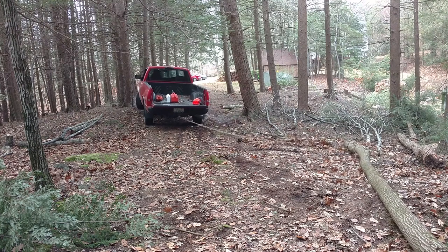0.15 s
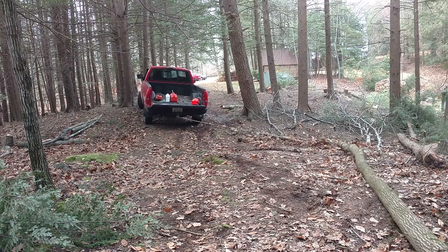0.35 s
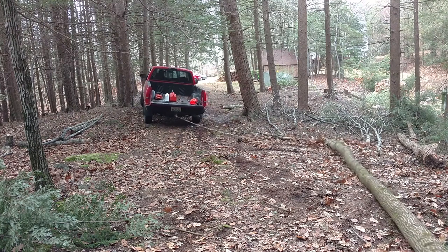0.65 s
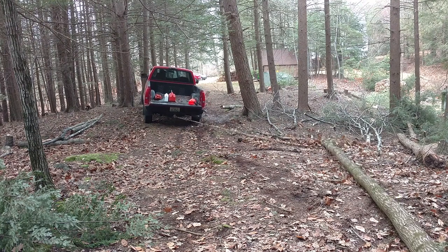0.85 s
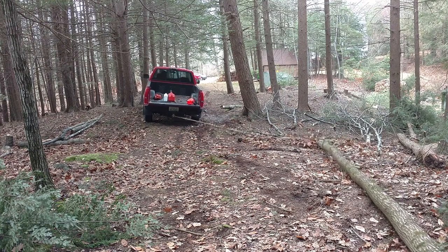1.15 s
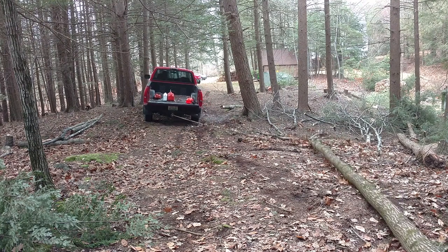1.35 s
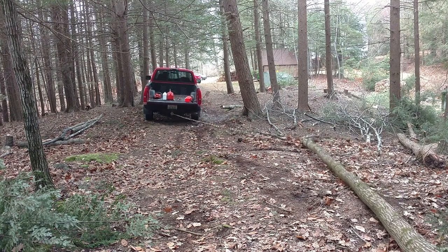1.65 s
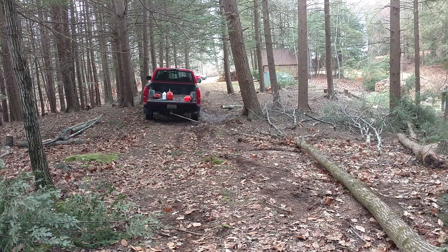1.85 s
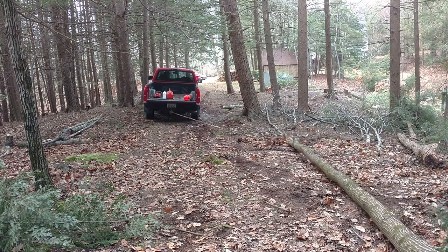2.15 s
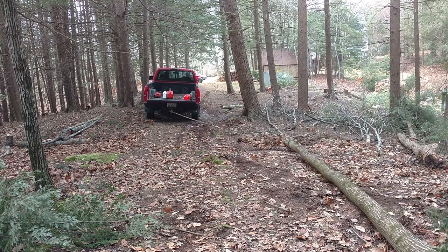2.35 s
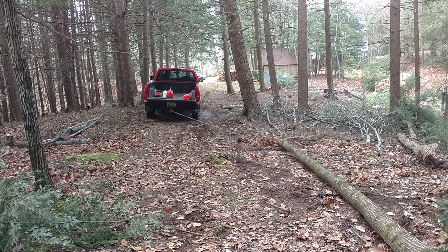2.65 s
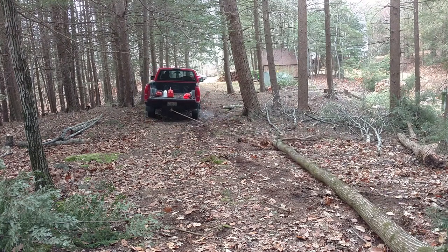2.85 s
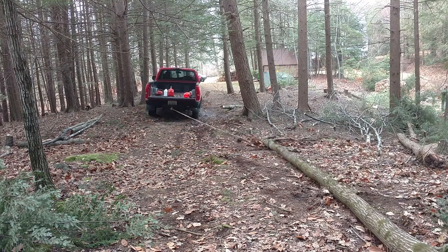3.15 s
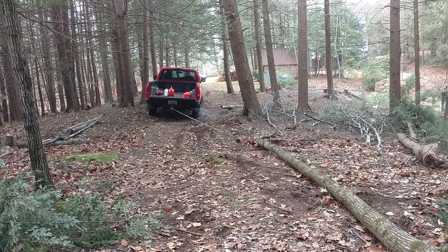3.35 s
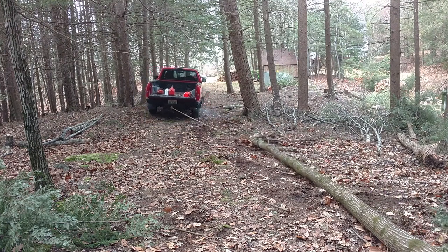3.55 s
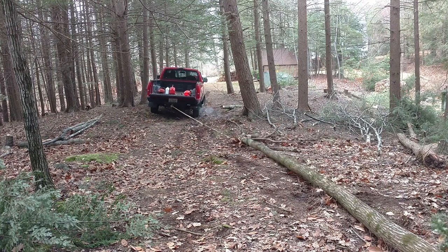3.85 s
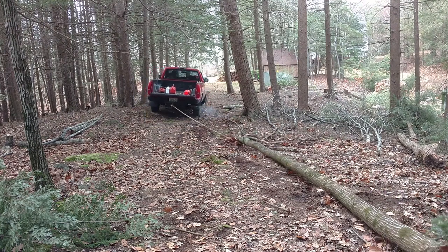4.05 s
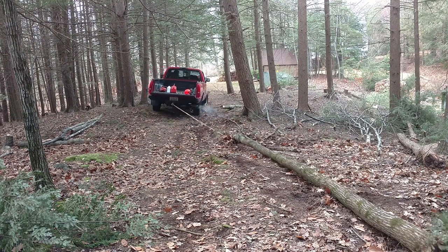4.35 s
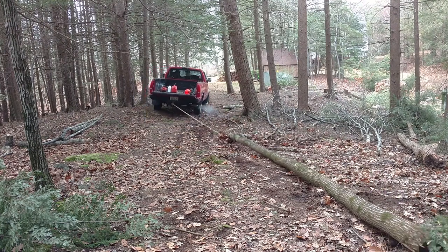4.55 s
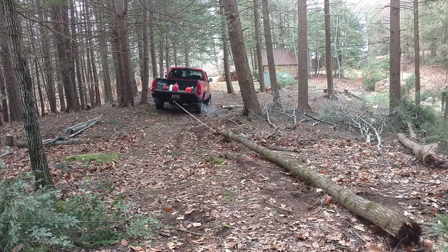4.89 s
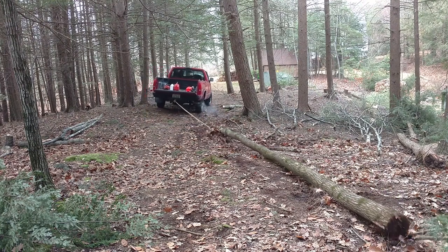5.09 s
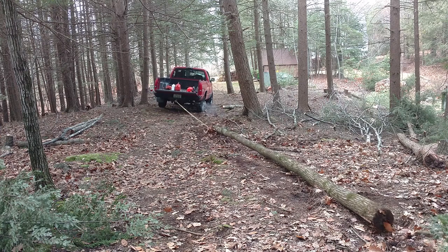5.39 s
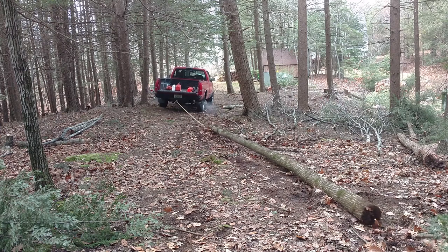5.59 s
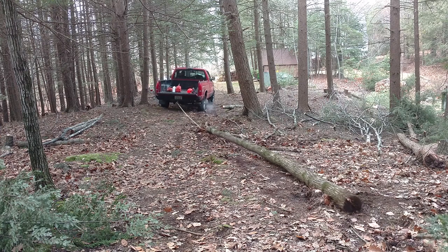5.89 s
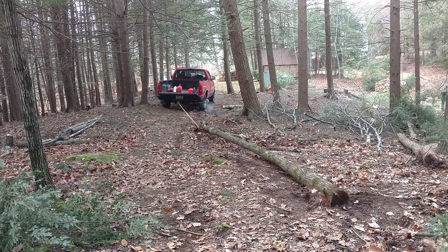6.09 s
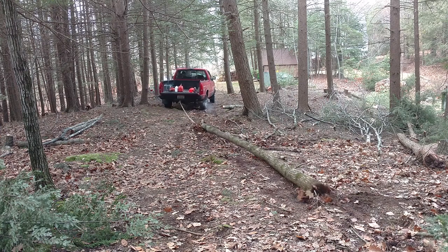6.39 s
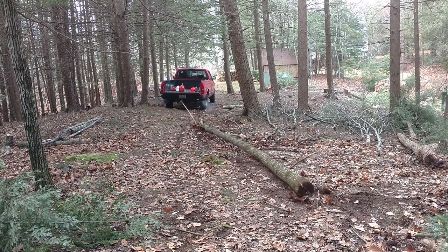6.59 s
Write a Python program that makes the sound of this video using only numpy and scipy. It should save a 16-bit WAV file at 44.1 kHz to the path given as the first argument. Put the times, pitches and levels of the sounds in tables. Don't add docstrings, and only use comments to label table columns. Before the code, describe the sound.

In a wood, a pickup's uneven low engine throbs in the distance while a log nearby drags over dry leaves. Crisp rustling and dull bark scraping run throughout, with twig cracks, a soft thud on a root and a very loud snap early on. The engine then revs in surges and the leaf crush thins. A small wide stereo microphone briefly ducks after loud cracks.

```python
import sys
import numpy as np
from scipy import signal
from scipy.fft import rfft, irfft, next_fast_len
from scipy.io import wavfile
from scipy.ndimage import uniform_filter1d

SR = 44100
rng = np.random.default_rng(int(sys.argv[2]) if len(sys.argv) > 2 else 0)


def ratio(d):
    e = np.asarray(d, float) / 20
    return 10 ** e


def dump_mix(stems):
    frames = np.atleast_2d(stems).T
    limited = np.clip(frames, -1, 1)
    pcm = np.round(limited * 32767).astype(np.int16)
    wavfile.write(sys.argv[1], SR, pcm)


N = 296793


def evened(x):
    return x / np.sqrt(np.mean(x ** 2) + 1e-20)


def columns(table, t):
    s, *rest = np.transpose(table)
    return [np.interp(t, s, c) for c in rest]


def read(points, hz):
    f, value = np.transpose(points)
    return np.interp(np.log(hz + 1), np.log(f + 1), value)


def add(mix, s, sound):
    part = mix[:, round(s * SR):][:, :sound.shape[-1]]
    part += sound[..., :part.shape[1]]


def delayed(hz, lag_samples):
    return np.exp(-2j * np.pi * hz * lag_samples / SR)


def resonate(x, hz, width_hz):
    r = np.exp(-np.pi * width_hz / SR)
    return 2 * signal.lfilter([1 - r], [1, -r * np.exp(2j * np.pi * hz / SR)], x).real


def wander(hz, count):
    step = 64
    lowpass = signal.butter(1, 2 * hz * step / SR)
    coarse = signal.lfilter(*lowpass, rng.standard_normal((count, N // step + 2)))
    curves = np.repeat(evened(coarse), step, axis=1)[:, :N]
    return uniform_filter1d(curves, size=128)


def capsule_hiss():
    lowpass = signal.butter(4, 13500 / SR * 2)
    return ratio(-60) * signal.lfilter(*lowpass, rng.standard_normal((2, N)))


def engine():
    # (time [s], engine cycle rate [Hz])
    speed = [(0, 16.3), (.7, 16.7), (1.9, 15.8), (2.2, 16.2), (2.5, 17.6), (2.85, 20), (3.15, 17.4),
             (3.35, 17.6), (3.7, 22.4), (4.05, 19.5), (4.3, 23.8), (4.5, 25.4), (4.7, 24.2), (5.05, 19.5),
             (5.6, 25), (5.85, 26.2), (6.55, 20.7), (6.73, 20.5)]
    # (time [s], engine effort [dB], exhaust flow [dB])
    effort = [(0, -40, -34), (.6, -42.5, -32.5), (.78, -41, -36.5), (.87, -41.5, -34.5), (1.5, -45, -34.5),
              (1.88, -42.5, -32), (2.2, -47, -34.5), (2.55, -40.5, -33.5), (2.95, -45.5, -33),
              (3.3, -42.5, -34), (3.75, -45.5, -36), (4.08, -52, -39.5), (4.35, -44.5, -34),
              (4.8, -46, -35.5), (5.08, -55.5, -36.5), (5.75, -40, -30), (6.2, -49.5, -32.5),
              (6.73, -48.5, -35)]
    # (cycle rate [Hz], third, fourth, fifth, sixth order [dB])
    low_orders = [(16, -30, -16, .5, -15), (17.4, -28, -24, -0.5, -19), (20.1, -14, -4.5, -9, -10),
                  (22, -1.5, -1, -6, -12), (26, -1, -9.5, -6, 1)]
    # (centre [Hz], width [Hz], level [dB])
    pipe_modes = [(92, 31, -3.5), (163.7, 13.2, 2.5), (205.5, 28.5, -5), (247.3, 24.3, -2), (314, 43, -8.5),
                  (397, 245, -16)]

    t = np.arange(N) / SR
    effort_db, rumble_db = columns(effort, t)
    turns_hz = uniform_filter1d(columns(speed, t)[0], size=4000)
    angle = 2 * np.pi * np.cumsum(turns_hz) / SR

    low_db = columns(low_orders, turns_hz)
    clean = sum(ratio(db) * np.sin(k * angle) for k, db in enumerate(low_db, 3))
    clean += ratio(low_db[0] - 19) * np.sin(2 * angle)

    orders = np.arange(7, 26)[:, None]
    pattern_db = 3.0 * (orders % 2 == 0) - 0.6 * (orders - 6)
    uneven = ratio(pattern_db + 3.0 * wander(hz=4.0, count=19))
    slip_rad = 0.055 * orders * wander(hz=3.0, count=19)
    start_rad = rng.uniform(0, 2 * np.pi, orders.shape)
    beats = (uneven * np.sin(orders * angle + slip_rad + start_rad)).sum(0)

    puffs = rng.standard_normal(N) * (1 + 0.65 * np.sin(angle))
    puffs = signal.lfilter(*signal.butter(2, 600 / SR * 2), puffs)
    drive = evened(beats) + 1.1 * evened(puffs)
    pipe = 0
    for k, (hz, width_hz, db) in enumerate(pipe_modes):
        pipe = pipe + (-1) ** k * ratio(db) * resonate(drive, hz, width_hz)
    return ratio(effort_db + 10.0) * clean + ratio(rumble_db) * evened(pipe)


def engine_among_trunks():
    motor = engine()
    echoes = np.array([np.roll(motor, 1410), np.roll(motor, 1930)])
    return motor + 0.062 * echoes


def root_bumps():
    # (time [s], level [dB], pitch [Hz], rise [s], t60 [s])
    hits = [
        (0.95, -25, 220, 0.011, 0.099),
        (1.2, -25, 190, 0.006, 0.054),
        (1.02, -15.5, 195, 0.014, 0.17),
        (1.02, -15.5, 222, 0.013, 0.17),
        (1.02, -24, 266, 0.014, 0.16),
        (1.897, -14, 180, 0.0084, 0.049),
        (.68, -25.5, 1390, .002, 0.034),
        (5.901, -28.5, 298, 0.036, 0.18),
        (0.35, -32, 740, 0.0017, 0.019),
        (6.126, -21.5, 1770, 0.0013, 0.0079),
    ]
    out, t = np.zeros((2, N)), np.arange(SR // 4) / SR
    for s, db, hz, rise_s, t60_s in hits:
        swell = np.minimum(t / rise_s, 1) * ratio(db - 60 * np.maximum(t - rise_s, 0) / t60_s)
        add(out, s, swell * np.sin(2 * np.pi * hz * t))
    return out


def snap_series(snaps, t60_s, fall_db=None):
    size, lead = 2048, 64
    out, t = np.zeros((2, N)), np.arange(size) / SR
    hz = np.fft.rfftfreq(size, 1 / SR)
    top = 1 / (1 + (hz / 10900) ** 4)
    for s, db, centre_hz, lag, *own_fall_db in snaps:
        noise = rng.standard_normal((3, size))
        burst = (noise[0] + 0.6 * noise[1:]) * ratio(-60 * t / max(t60_s, 0.002))
        burst[:, 0] += 4.0
        octaves = np.log2((hz + 1) / centre_hz)
        colour = ratio(db - (fall_db or own_fall_db[0]) * octaves ** 2) * top
        delay = delayed(hz, lead + np.array([[lag], [0]]))
        add(out, s - lead / SR, irfft(rfft(burst) * colour * delay))
    return out


def twigs():
    # (time [s], level [dB], centre [Hz], left lag [samples], fall at one octave from the centre [dB])
    cracks = [(.6810, -10.5, 1240, 4, 1), (.6850, -9, 1188, 3.4, 5), (.7857, -6.5, 6500, 4, 2),
              (1.8507, -10.2, 4000, 4, 13), (1.9111, 1, 2780, 4.1, 1.9), (1.9136, -1.5, 3180, 3, 5),
              (4.0094, -13, 4200, 8, 12.1), (5.3701, -14.5, 3000, 0.1, -0.3), (5.6171, -16, 2600, -1.4, 2),
              (5.6976, -19, 5000, -1, 1.6), (5.7201, -13.5, 1700, 0.5, 2.5), (6.0488, -15.5, 3580, -1.1, 3),
              (6.1271, -9, 2200, -0.2, 0.9)]
    # (time [s], level [dB], centre [Hz], left lag [samples])
    ticks = [(.4047, -7, 1090, 15), (.414, -12, 8000, 6.5), (1.4796, -16, 3600, 7),
             (1.606, -10.5, 3600, 6.5), (2.335, -16, 1800, 2), (2.574, -14, 5000, 0.5),
             (3.1679, -13, 1100, 18), (3.958, -13, 3000, 10), (4.153, -14, 3400, -10.5),
             (4.2372, -15, 6960, 9), (4.9464, -25, 4500, 6), (5.172, -20.5, 8000, 7.5),
             (5.192, -17.5, 3500, -3.5), (5.4608, -19, 2800, -3), (5.6245, -20, 6000, 1),
             (5.6375, -13.5, 3200, -1.5), (5.648, -24, 4200, 0), (5.6906, -23, 4500, -2),
             (5.7648, -22, 8000, -1), (5.984, -23, 3200, 20), (6.2832, -25, 6500, 9),
             (6.3017, -14, 5500, 3.5), (6.3254, -14.5, 5200, 3.5), (6.553, -24, 2500, 1),
             (6.6472, -18, 3400, -3)]
    # (time [s], level [dB], centre [Hz], left lag [samples])
    crunches = [
        (1.01, -6.5, 380, 0),
        (1.035, -6, 360, -1),
        (1.055, -14, 700, 3),
        (1.9, -3, 325, 3),
        (1.769, -10, 3200, -1.5),
        (2.1752, -17.5, 4500, 14),
        (3.1222, -6.5, 4340, 10.5),
        (4.068, -12.5, 5800, 10),
        (6.7, -18, 3530, -1.5),
    ]
    thick = snap_series(cracks, t60_s=0.0081)
    thin = snap_series(ticks, t60_s=0.0073, fall_db=6.9)
    leafy = snap_series(crunches, t60_s=0.019, fall_db=6.5)
    return thick + thin + leafy


def grains(per_s, spread_db, grain_s, smooth):
    size = ratio(spread_db * np.minimum(rng.exponential(1, N), 5)) * (rng.random(N) < per_s / SR)
    keep = np.exp(-1 / (grain_s * SR))
    shape = evened(signal.lfilter([1], [1, -keep], size))
    return evened(rng.standard_normal(N) * (smooth + shape))


def along_log(colour, level_db, patchy_db, **grain):
    # (time [s], left lag of butt end [samples], left lag of chained end [samples], butt share [0-1])
    bearing = [(0, 9.2, 4.5, 0.6), (1, 9.2, 5, 0.22), (2, 8.6, 3.5, 0.23), (3, 8.6, 1.5, 0.57),
               (4, 9.1, 1, 0.83), (4.6, 7.8, 1, 0.61), (5.1, 6.3, 0.75, 0.09), (5.8, 3.6, -0.5, 0.34),
               (6.3, 4.5, -0.5, 0.86), (6.73, 2, 1.5, 0.34)]
    # (frequency [Hz], share arriving from all around [0-1])
    scatter_share = [(100, 0), (300, 0.16), (600, 0.06), (1500, 0.34), (2200, 0), (2800, 0.08), (3800, 0.6),
                     (5200, 0.35), (7000, 0.58), (12000, 0.82)]

    frames = dict(nperseg=256, noverlap=192)
    hz, t, spectra = signal.stft([grains(**grain) for _ in range(4)], SR, **frames)
    butt, chained, left, right = spectra
    hz = hz[:, None]
    butt_lag, chained_lag, share = columns(bearing, t)
    butt = np.sqrt(np.clip(share, 0, 1)) * butt
    chained = np.sqrt(np.clip(1 - share, 0, 1)) * chained
    late = butt * delayed(hz, butt_lag) + chained * delayed(hz, chained_lag)

    scatter = np.clip(read(scatter_share, hz), 0, 1)
    direct = np.array([late, butt + chained])
    around = np.array([left, right])
    z = np.sqrt(1 - scatter) * direct + np.sqrt(scatter) * around

    patches = uniform_filter1d(rng.standard_normal(late.shape), size=7, axis=0)
    patches = uniform_filter1d(patches, size=30, axis=1)
    z *= ratio(read(colour, hz) + patchy_db * evened(patches))
    return ratio(level_db) * signal.istft(z, SR, **frames)[1][:, :N]


def leaves():
    # (time [s], leaf crush level [dB])
    drag = [(0, -26), (.14, -27.5), (.19, -33.5), (.37, -30.5), (.85, -33), (1.0, -39.5), (1.04, -33.5),
            (1.76, -33.5), (1.85, -30.5), (2.3, -37.5), (3.01, -36), (3.15, -34), (3.8, -30.5),
            (4.22, -36.5), (4.85, -37), (5.17, -42), (5.74, -39), (6.73, -45.5)]
    # (frequency [Hz], density [dB per Hz])
    crush_colour = [(300, -38), (900, -7.5), (1800, -4), (3200, 0.5), (4500, 0), (7000, -2.5), (8500, -3.5),
                    (10000, -7.5), (11500, -12.5), (13300, -17), (14300, -21), (15000, -17.5)]
    # (frequency [Hz], density [dB per Hz])
    scrape_colour = [(40, -8), (150, 5), (350, -1.5), (600, -3.5), (1200, -6.5), (2200, -9.5), (4000, -14),
                     (9000, -27)]

    t = np.arange(N) / SR
    crush_db, = columns(drag, t)
    scrape_db = -27.5 + 0.66 * (crush_db - crush_db.mean())
    scrape_db += 2 * np.maximum(t - 4.28, 0)
    crush = along_log(crush_colour, crush_db + 8.5, patchy_db=1.0,
                      per_s=900, spread_db=3.0, grain_s=0.0038, smooth=0.96)
    scrape = along_log(scrape_colour, scrape_db, patchy_db=1.5,
                       per_s=300, spread_db=1.0, grain_s=0.0027, smooth=1.0)
    return crush + scrape


def scene():
    return capsule_hiss() + engine_among_trunks() + root_bumps() + twigs() + leaves()


def gain_control():
    # (time [s], gain after the drop [dB], recovery [dB per s])
    ducks = [
        (0, -10, 12.5),
        (0.788, -13.5, 3.5),
        (1.924, -23, 12),
        (4.017, -6, 5.5),
        (5.199, -4.5, 3.5),
        (6.133, -5.5, 5.5),
    ]
    t = np.arange(N) / SR
    drops = np.transpose(ducks)
    latest = np.maximum(np.searchsorted(drops[0], t, "right") - 1, 0)
    s, db, db_per_s = drops[:, latest]
    gain_db = np.minimum(db + db_per_s * (t - s), 0)
    return ratio(uniform_filter1d(gain_db, size=200))


def top_cut(x):
    return signal.sosfilt(signal.butter(12, 16410, fs=SR, output="sos"), x)


def record(dry):
    # (frequency [Hz], left minus right [dB])
    housing = [(60, -0.1), (200, 1), (600, 1), (2000, -3), (7000, 3), (8400, 4), (10000, 4), (13000, 0)]
    # (frequency [Hz], cross-feed gain [0-1])
    cross = [(100, 0.6), (1300, 0.95), (1900, 1), (2350, 0.8), (2900, 0.77), (5200, 0.6), (10000, 0.44),
             (12000, 0.47), (13000, 0.5), (14500, 0.4)]

    size = next_fast_len(N)
    hz = np.fft.rfftfreq(size, 1 / SR)
    z = rfft(dry * gain_control(), size)
    z *= ratio(read(housing, hz) * np.array([[0.5], [-0.5]]))
    z /= np.sqrt(1 + (58 / (hz + 1)) ** 6.2)
    z *= 0.02 + 1 / (1 + (hz / 15250) ** 120)

    lag_samples = 17 + 0.48 / (1 + (hz / 3800) ** 4)
    feed = np.clip(read(cross, hz), 0, 0.95) * delayed(hz, lag_samples)
    wide = z - feed * z[::-1]
    return top_cut(irfft(wide, size)[:, :N])


dry = scene()
out = record(dry)
dump_mix(out)
```